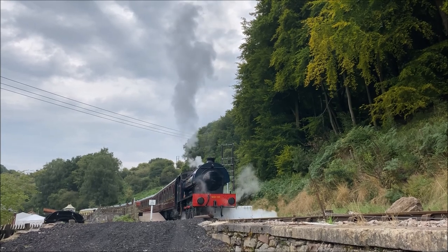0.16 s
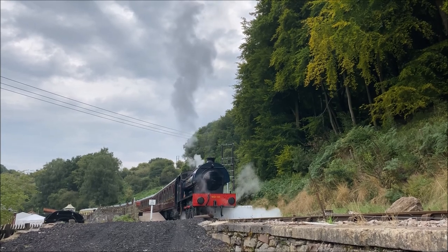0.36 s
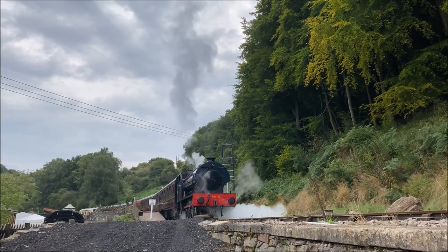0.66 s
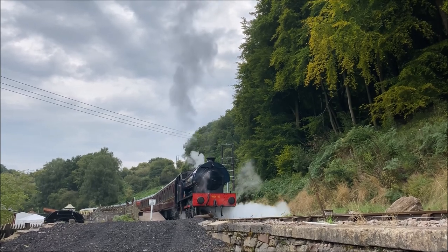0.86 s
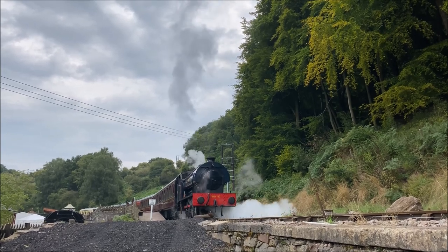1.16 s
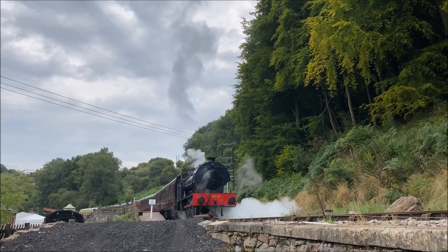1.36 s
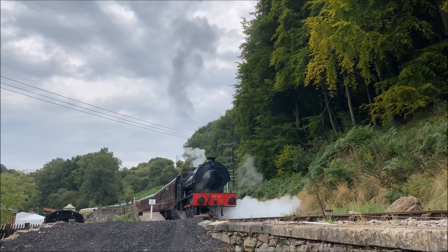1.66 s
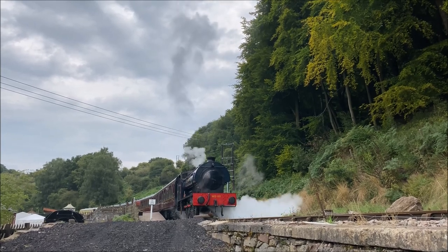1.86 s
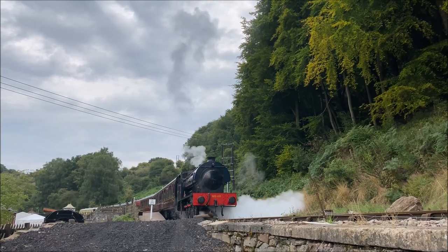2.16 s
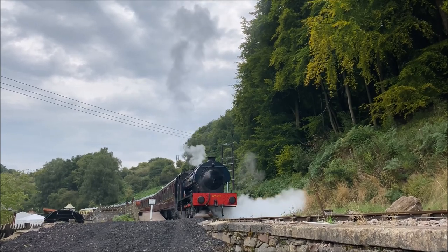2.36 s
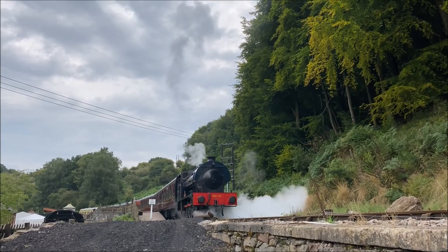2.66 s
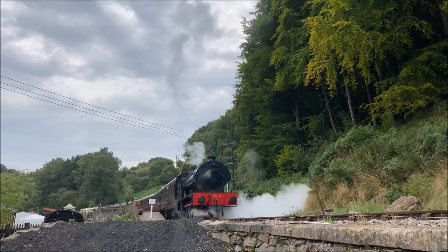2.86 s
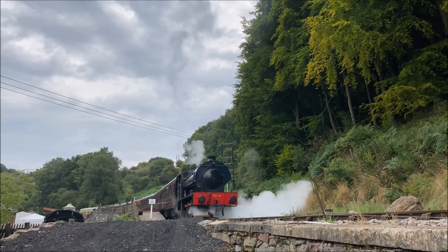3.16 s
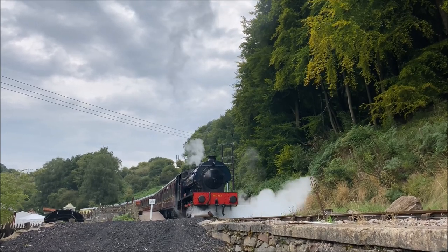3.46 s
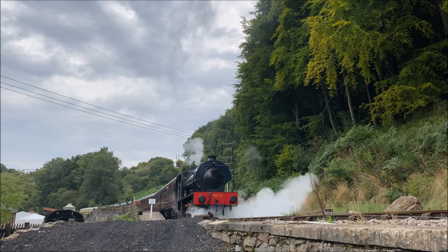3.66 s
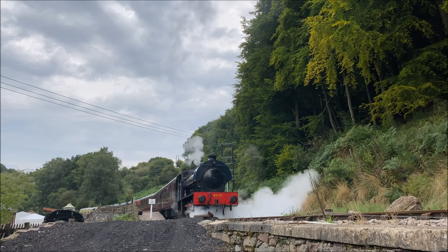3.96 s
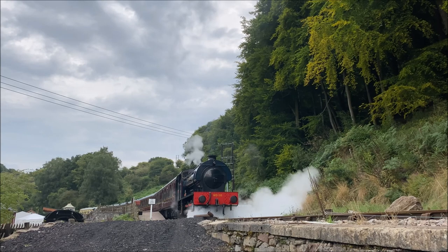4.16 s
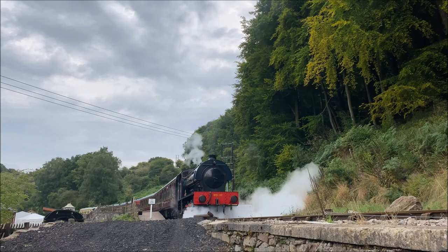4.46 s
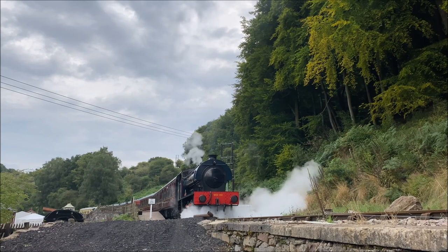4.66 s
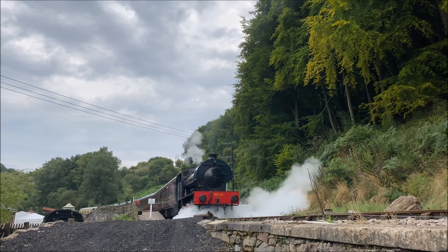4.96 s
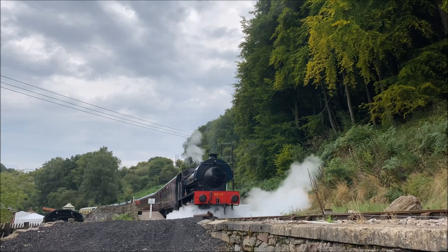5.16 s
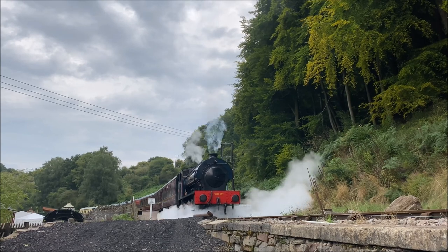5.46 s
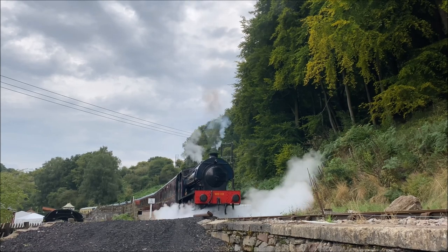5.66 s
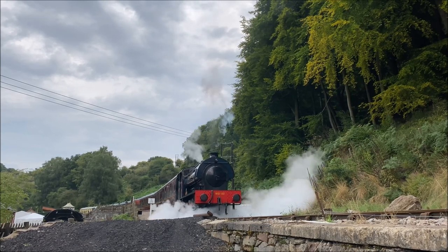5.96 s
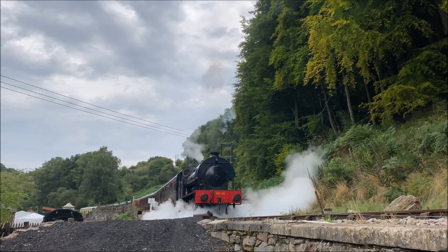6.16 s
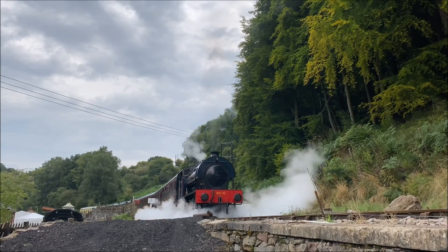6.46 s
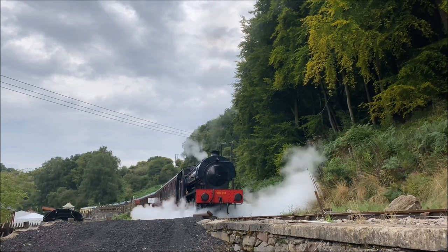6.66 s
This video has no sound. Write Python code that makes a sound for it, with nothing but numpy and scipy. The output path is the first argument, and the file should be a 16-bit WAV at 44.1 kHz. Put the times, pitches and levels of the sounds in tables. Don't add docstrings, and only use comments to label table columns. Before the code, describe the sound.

A standing steam locomotive jets loud, bright hissing steam that sinks, then swells again over a low chimney rumble, with one soft exhaust thump late.

```python
import sys
import numpy as np
from scipy import signal
from scipy.io import wavfile
from scipy.ndimage import uniform_filter1d

SR = 44100
rng = np.random.default_rng(int(sys.argv[2]) if len(sys.argv) > 2 else 0)


def natural_amplitude(level_db):
    exponent = np.asarray(level_db, float) / 20
    return 10 ** exponent


def wrap_up_sound(samples):
    columns = np.atleast_2d(samples).T
    tamed = np.clip(columns, -1, 1)
    steps = np.round(tamed * 32767).astype(np.int16)
    wavfile.write(sys.argv[1], SR, steps)


N = 300762

# f/Hz, width/Hz, lift/dB
BANK_ECHOES = [(1362, 108, 7), (1730, 45, 6.5), (1832, 47, 7), (2207, 82, 6), (2530, 90, 1),
               (2890, 120, 0.5), (3570, 180, 2.5), (4090, 61, 3), (4520, 200, 2.5), (5090, 90, 2),
               (5450, 110, 4.5), (5830, 100, 4), (6130, 320, 3), (6180, 88, 3)]


def jet_pressure(t):
    # t/s, jet pressure/dB, wetness that lifts the spray/dB
    cock_events = [(0, -22.5, 0), (.34, -23, 0), (.7, -24, 1.5), (.8, -25.5, 1), (1.33, -25.5, -0.5),
                   (1.88, -29.5, 0), (2.5, -34, -1.5), (2.75, -32.5, 0), (3.12, -30, 0.5), (3.9, -29.5, 1),
                   (4.8, -23, -0.5), (5.28, -23.5, -0.5), (5.34, -25.5, 0.5), (5.6, -23.5, -0.5),
                   (6.0, -27, 2), (6.14, -30, 4), (6.67, -30.5, 3), (6.82, -29.5, 1.5)]
    s, jet_db, wet_db = np.transpose(cock_events)
    return np.interp(t, s, jet_db), np.interp(t, s, wet_db)


def drain_cocks(t, hz, eddies, veil, gust):
    # f/Hz, density/dB per Hz
    jet_points = [(1500, -32), (2600, -7.5), (3300, -3), (3800, -2.5), (4200, -2), (5000, 0), (5500, -3.5),
                  (6200, -3.5), (7200, -4.5), (8200, -8.5), (9500, -9.5)]
    spray_points = [(6000, -28), (8000, -11), (9300, -0.5), (10500, -1), (12000, 1.5), (13000, -0.5),
                    (13900, 2.5), (15000, -0.5), (15700, -4)]
    mouth_points = [(1100, -17), (1550, -7), (2000, -4), (2900, -3), (3600, -11.5)]
    jet_db, wet_db = jet_pressure(t)
    jet_rel_db = jet_db + 24
    spray_db = -28 + 1.16 * jet_rel_db + wet_db
    mouth_db = -31 + 0.45 * jet_rel_db
    jet_flicker_db = 0.51 * eddies + 0.2 * veil + 0.37 * gust
    spray_flicker_db = 0.38 * eddies + 0.41 * veil + 0.82 * gust
    mouth_flicker_db = 0.52 * eddies + 0.3 * veil + 0.35 * gust
    return (layer(jet_db, colour(jet_points, BANK_ECHOES, hz), jet_flicker_db)
            + layer(spray_db, colour(spray_points, [], hz), spray_flicker_db)
            + layer(mouth_db, colour(mouth_points, BANK_ECHOES, hz), mouth_flicker_db))


def draught_level(t):
    # t/s, rumble/dB
    draught_events = [
        (0, -46),
        (1.1, -49),
        (2.75, -50),
        (3.0, -44),
        (3.4, -42.5),
        (5.1, -42),
        (6.1, -47),
        (6.4, -44.5),
        (6.82, -45),
    ]
    return np.interp(t, *np.transpose(draught_events))


def chimney(t, hz, eddies, veil, lumps):
    # f/Hz, density/dB per Hz
    rumble_points = [(20, -36), (36, -24), (55, 4.5), (105, 2), (165, -1), (300, -11), (420, -14),
                     (700, -18)]
    roar_points = [(250, -10.5), (330, -7.5), (520, -10), (650, -2.5), (850, -5), (1200, -4.5), (1500, -14),
                   (2000, -31)]
    thrum_points = [(18, -22), (32, -10), (48, 0), (60, -8), (80, -25)]
    rumble_db = draught_level(t)
    draught_rel_db = rumble_db + 43
    jet_rel_db = jet_pressure(t)[0] + 24
    roar_db = -37 + 0.32 * draught_rel_db + 0.25 * jet_rel_db
    thrum_db = -59 + 2.3 * draught_rel_db + 0.02 * jet_rel_db
    return (layer(rumble_db, colour(rumble_points, [], hz), 0.71 * eddies)
            + layer(roar_db, colour(roar_points, BANK_ECHOES, hz), 0.84 * veil + 0.8 * eddies)
            + layer(thrum_db, colour(thrum_points, [], hz), 2.6 * lumps))


def air_columns(t, hz, eddies):
    column_tones = [
        (1009, 8.3, 58, 1.0),
        (217.5, 2.6, 36, 0.2),
        (2366, 17, 116, 1.4),
    ]
    # t/s, lift/dB
    blower_surges = [(.13, 6), (.3, 3), (1.54, -14), (2.05, 5.5), (2.35, 8), (2.47, 5.5), (2.64, -5),
                     (2.8, 1), (3.33, 4), (3.63, 4.5), (3.9, 8.5), (4.01, 4.5), (4.78, 7.5), (5.09, 6),
                     (5.4, -12), (5.79, 3.5), (6.15, 0), (6.44, 3)]
    # t/s, lift/dB
    flue_booms = [
        (3.06, 3.7),
        (3.44, 11),
        (3.72, 3.7),
        (5.09, 5.8),
        (5.28, 10),
        (5.51, 3.5),
        (6.15, 3),
        (6.44, 2.3),
        (6.74, 5),
    ]
    draught_rel_db = draught_level(t) + 43
    jet_rel_db = jet_pressure(t)[0] + 24
    blower_db = -42 - 0.28 * t + bumps(t, blower_surges, half_s=0.051)
    flue_db = -45.5 + 0.69 * draught_rel_db + 0.01 * jet_rel_db + bumps(t, flue_booms, half_s=0.037)
    ring_db = -39.5 + 0.6 * jet_rel_db
    power = 0
    for db, (start_hz, climb, width_hz, flicker_db) in zip([blower_db, flue_db, ring_db], column_tones):
        centre_hz = start_hz + climb * t[:, None]
        power = power + layer(db, note(centre_hz, width_hz, hz), flicker_db * eddies)
    return power


def exhaust_beat(t, hz):
    # f/Hz, density/dB per Hz
    beat_points = [(30, -22), (55, 1), (110, 4.5), (170, -3), (245, 1.5), (320, -14), (500, -8)]
    beat_s, swell_s, peak_db = 5.26, 0.083, -30
    beat_db = peak_db - 4.0 * ((t - beat_s) / swell_s) ** 2
    return layer(beat_db, colour(beat_points, [], hz), 0)


def steam_power(t, hz):
    frames, bins = len(t), len(hz)
    eddies = patches(frames, bins, wide=24, long=8)
    veil = patches(frames, bins, wide=184, long=5)
    gust = patches(frames, 1, wide=1, long=3.6)
    lumps = patches(frames, 1, wide=1, long=14)
    return (drain_cocks(t, hz, eddies, veil, gust) + chimney(t, hz, eddies, veil, lumps)
            + air_columns(t, hz, eddies) + exhaust_beat(t, hz))


def steam():
    size, hop = 2048, 512
    frames, hz = N // hop + 6, np.fft.rfftfreq(size, 1 / SR)
    a, b, c, d = np.moveaxis(rng.standard_normal((frames, len(hz), 4)), 2, 0)
    like, port_db = ports(hz)
    left = a + 1j * b
    right = like * left + np.sqrt(1 - abs(like) ** 2) * (c + 1j * d)
    magnitude = np.sqrt(steam_power(np.arange(frames) * hop / SR, hz))
    spectra = np.array([left, right]) * natural_amplitude(port_db)[:, None] * magnitude
    sound = signal.istft(np.swapaxes(spectra, 1, 2), nperseg=size, noverlap=size - hop)[1]
    return natural_amplitude(2.0) * sound[:, :N]


def whistle():
    # t/s, f/Hz, level/dB
    leak_tone = [
        (.09, 850, -58),
        (.14, 845, -47),
        (.19, 830, -46),
        (.22, 800, -47),
        (.26, 755, -41),
        (.29, 715, -43),
        (.31, 700, -60),
    ]
    s, hz, db = np.transpose(leak_tone)
    t = np.arange(N) / SR
    waver = 1 + 0.0023 * evened(uniform_filter1d(rng.standard_normal(N), size=600))
    tone = np.sin(2 * np.pi * np.cumsum(np.interp(t, s, hz) * waver) / SR)
    port_gain = natural_amplitude(np.array([[7.0], [-3.0]]))
    return natural_amplitude(np.interp(t, s, db, -120, -120)) * tone * port_gain


def ports(hz):
    # f/Hz, likeness/0-1, right leads/rad, left-right/dB
    low_ports = [(90, .93, 0, -.9), (260, .86, .1, -.2), (520, .2, 0, .3), (720, .1, -3, 2),
                 (860, .35, -.7, 5), (1040, .84, .2, 4), (1170, .4, 2, .5), (1330, .62, 1.2, -1.5),
                 (1480, .62, 2.5, -1.5), (1570, .15, 1, -3.5), (1760, .62, -.3, -.5), (2040, .3, 1, -1.5),
                 (2230, .8, -.3, -2), (2500, .74, -.5, -4.2),
                 (2680, .38, -1.2, -3), (3050, .52, -2.2, -3.4), (3850, .52, -3.1, -.8), (4030, .1, 1, 1.5),
                 (4250, .3, -.5, 1), (4550, .65, -1.3, -.5), (5200, .5, -2, 1), (5320, .15, 3, -.5),
                 (5570, .62, .9, -1.5), (5850, .3, .3, -1.5), (6400, .6, 0, .5), (6950, .4, -1.3, -.5),
                 (7450, .3, 2.8, -1), (8150, .15, 2, .5), (8650, .4, -1.5, 4.5), (9220, .72, -1.6, -.2)]
    # f/Hz, right leads/half turns
    high_ports = [(9220, -.54), (10020, 0), (12050, 1), (13980, 2), (15750, 3)]
    # f/Hz, likeness/0-1
    high_likeness = [(9200, 0.3), (10000, 0.85), (12000, 0.9), (14000, 0.87), (15700, .8)]
    f, like, lead, balance_db = np.transpose(low_ports)
    low = np.interp(hz, f, like * np.exp(1j * lead))
    high_like = np.clip(np.interp(hz, *np.transpose(high_likeness)), 0, 1)
    high = high_like * np.exp(1j * np.pi * np.interp(hz, *np.transpose(high_ports)))
    balance_db = np.interp(hz, f, balance_db, right=0)
    ripple = evened(uniform_filter1d(rng.standard_normal((2, len(hz))), size=3))
    ripple_db = 1.1 * ripple * (hz > 1500)
    return np.where(hz < f[-1], low, high), np.array([balance_db, -balance_db]) / 2 + ripple_db


def layer(db, shape, flicker_db):
    return natural_amplitude(db[:, None] + flicker_db) ** 2 * shape


def colour(points, peaks, hz):
    f, db = np.transpose(points)
    shape_db = np.interp(np.log(hz + 1), np.log(f + 1), db, -90, -90)
    lift = 1
    for centre_hz, width_hz, lift_db in peaks:
        lift = lift + (natural_amplitude(lift_db) ** 2 - 1) / (1 + (2 * (hz - centre_hz) / width_hz) ** 2)
    power = natural_amplitude(shape_db) ** 2 * lift
    return power / power.sum()


def note(centre_hz, width_hz, hz):
    power = 1 / (1 + (2 * (hz - centre_hz) / width_hz) ** 4)
    return power / power.sum(axis=1, keepdims=True)


def bumps(t, rows, half_s):
    s, db = np.transpose(rows)
    return (db * np.exp(-((t[:, None] - s) / half_s) ** 2)).sum(1)


def patches(frames, bins, wide, long):
    field = rng.standard_normal((frames, bins))
    field = uniform_filter1d(field, max(round(long), 1), 0)
    return evened(uniform_filter1d(field, max(round(wide), 1), 1))


def evened(x):
    return x / np.sqrt(np.mean(x ** 2) + 1e-20)


def scene():
    return steam() + whistle()


def band_limit(x):
    return signal.sosfilt(signal.butter(12, 16030, fs=SR, output="sos"), x)


def record(dry):
    edge = signal.firwin(511, 15750, window=("kaiser", 9), fs=SR)
    mix = signal.oaconvolve(dry, edge[None], "same")
    return band_limit(mix)


dry = scene()
out = record(dry)
wrap_up_sound(out)
```